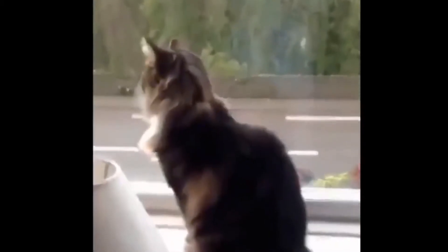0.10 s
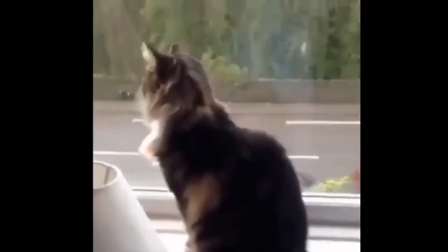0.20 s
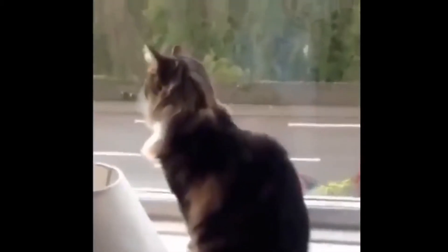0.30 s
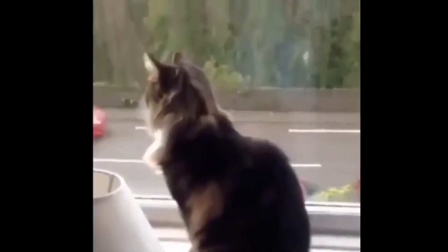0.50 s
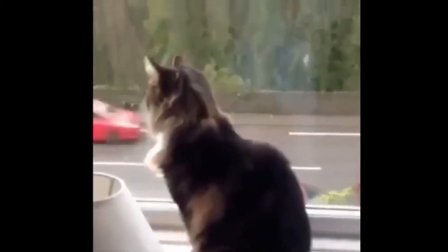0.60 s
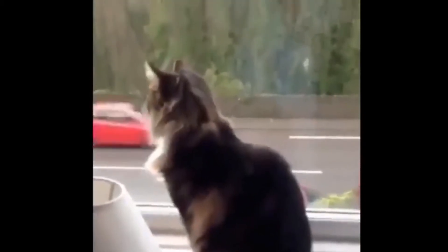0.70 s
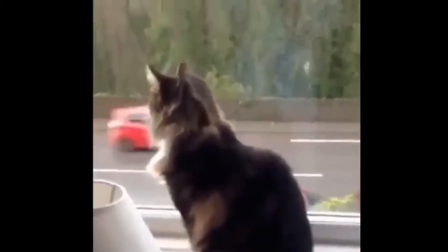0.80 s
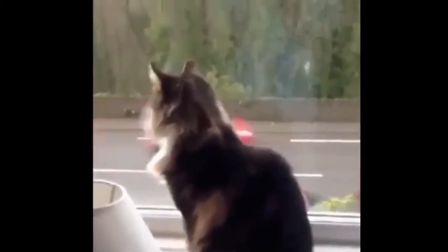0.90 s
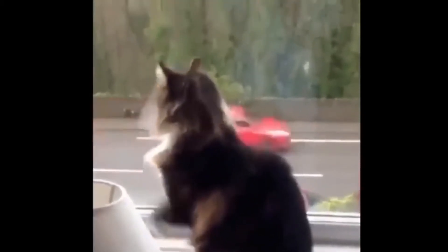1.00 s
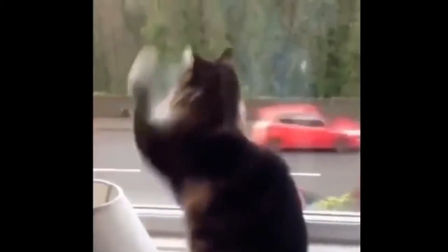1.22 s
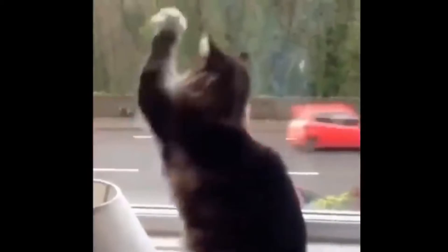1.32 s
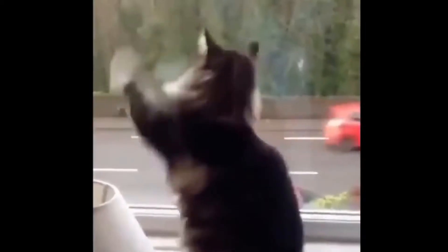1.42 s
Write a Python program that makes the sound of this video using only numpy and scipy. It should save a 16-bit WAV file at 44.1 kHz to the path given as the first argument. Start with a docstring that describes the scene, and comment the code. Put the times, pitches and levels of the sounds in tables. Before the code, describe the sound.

A cat bats a window pane: a rapid flurry of soft, low thuds, scuffing fur and pads and a brief claw scratch, then quiet with one tiny late tick; small room, phone a couple of metres away.

```python
"""A quiet room with a window pane, at which a cat scrabbles; a phone listens a couple of metres off.
Dragging pads keep a pane mode humming by stick and slip; soft blows thud as brief pushes on decaying modes.
Fur and pads scuff as dense random grains over rubbing noise; claws scratch as decaying bands of noise.
Behind it lie a faint hiss of drifting noise bands and a low flickering drone of the road through the glass,
which is noise through one broad resonance."""
import sys
import numpy as np
from scipy import signal
from scipy.fft import rfft, irfft
from scipy.io import wavfile
from scipy.ndimage import uniform_filter1d

SR = 44100
rng = np.random.default_rng(int(sys.argv[2]) if len(sys.argv) > 2 else 0)


def unload_audio(sound):
    """Save the sound as a 16-bit wav file, at the path given as the first command line argument."""
    columns = np.transpose(np.atleast_2d(sound))
    # keep every value between -1 and 1, then stretch to whole-number steps
    steps = np.round(np.clip(columns, -1, 1) * 32767)
    wavfile.write(sys.argv[1], SR, steps.astype(np.int16))


def attenuation_scalar(level_db):
    """Turn a level in dB into a linear amplitude multiplier (20 dB per decade)."""
    decades = np.asarray(level_db, float) / 20
    return 10 ** decades


N = 63945  # length [samples]

# Modes of pane and frame, ringing freely: (frequency [Hz], relative level [dB], t60 [s])
PANE_MODES = [(55, -29.5, 0.59), (92, -7, 0.23), (124.3, -7, 0.11), (168, -4.5, 0.37), (232, -0.5, 0.11),
              (281, -24, 0.089), (388, -4.5, 0.22), (469, -15, 0.2), (586, -16, 0.12), (645, -9, 0.083),
              (750, -12.5, 0.085), (844.7, -12.5, 0.21), (946, -15, 0.026), (1067, -16, 0.21),
              (1455, -24.5, 0.028), (1620, -13, 0.08), (2335, -30, 0.26), (2564, -13, 0.17),
              (2710, -24, 0.055), (3450, -19.5, 0.05)]


def unit(x):
    """Normalisation: scale to rms 1."""
    return x / np.sqrt(np.mean(x ** 2))


def colour(x, shape):
    """Spectral shaping: weight each frequency by a curve of (frequency [Hz], density [dB per Hz]); rms 1."""
    hz, db = np.array(shape, float).T
    f = np.maximum(np.arange(N // 2 + 1) * SR / N, 1)
    gain_db = np.interp(np.log(f), np.log(hz), db, left=-80, right=-80)
    return unit(irfft(rfft(x) * attenuation_scalar(gain_db), N))


def band(x, hz, width_hz):
    """Resonance: a second-order peak passes a band around its centre."""
    return signal.lfilter(*signal.iirpeak(hz, hz / width_hz, fs=SR), x)


def walk(rate):
    """Slow random modulation: Gaussian levels held 1 / rate s, then smoothed twice."""
    hold = int(SR / rate)
    steps = np.repeat(rng.standard_normal(N // hold + 1), hold)
    return 1.83 * uniform_filter1d(uniform_filter1d(steps, hold), hold)[:N]


def column(table, index):
    """Linear interpolation of one column over time, per sample; end values hold outside the span."""
    rows = np.array(table, float)
    return np.interp(np.arange(N) / SR, rows[:, 0], rows[:, index])


def fade(table):
    """Gating: on only within the time span of a curve, with linear ramps at both ends."""
    t = np.arange(N) / SR
    rise = np.clip((t - table[0][0]) / 0.0089, 0, 1)
    fall = np.clip((table[-1][0] - t) / 0.095, 0, 1)
    return rise * fall


def room():
    """Filtered noise: hiss whose bands drift a little, and a low resonance whose level flickers."""
    # Spectrum of the hiss: (frequency [Hz], density [dB per Hz])
    hiss_shape = [(15, -51), (25, -5.5), (119, -13), (258, 0.5), (336, -21.5), (482, -16.5), (819, -24.5),
                  (923, -22), (1170, -25), (1290, -27.5), (4100, -21.5), (7860, -25.5), (10200, -62.5),
                  (17300, -120)]
    hiss_db, drift_db = -68, 0.8
    drone_hz, drone_width_hz, drone_db = 210, 84, -70

    drone = unit(band(rng.standard_normal(N), drone_hz, drone_width_hz))
    drone = drone * attenuation_scalar(drone_db + 1.1 * walk(9.4))
    white = 0
    for f in 30 * 2 ** np.arange(0, 8.4, .5):  # half-octave steps
        white = white + band(rng.standard_normal(N), f, f / 3) * attenuation_scalar(drift_db * walk(9))
    return colour(white, hiss_shape) * attenuation_scalar(hiss_db) + drone


def claws():
    """Scratching friction: claw on glass gives band-limited noise that chatters and decays exponentially."""
    # Scratches: (time [s], initial level [dB], centre [Hz], width [Hz], t60 [s])
    scratches = [(0.041, -71.5, 1230, 1100, 0.75), (0.1867, -54, 2170, 3000, 0.42),
                 (0.216, -51, 2450, 2600, 0.6), (0.265, -43, 3920, 4480, 0.1),
                 (0.304, -50.5, 5120, 3550, 0.071), (0.3203, -25.5, 1812, 1990, 0.061),
                 (0.453, -53, 4980, 4020, 0.09), (1.4374, -56.5, 2615, 2140, 0.27)]
    chatter_db, chatter_hz = 1.5, 600  # a claw catches and slips

    t, out = np.arange(N) / SR, 0
    for s, db, hz, width_hz, t60 in scratches:
        age = np.maximum(t - s, 0)
        edges = [max(hz - width_hz / 2, 100), hz + width_hz / 2]
        bandpass = signal.butter(5, edges, "band", fs=SR, output="sos")
        noise = unit(signal.sosfilt(bandpass, rng.standard_normal(N)))
        envelope = np.minimum(age / .0006, 1) * np.exp(-np.log(1000) * age / t60)
        out = out + attenuation_scalar(db + chatter_db * walk(chatter_hz)) * noise * envelope
    return out


def blows():
    """Modal impact: a push convolved with the modes; longer contact rings only low modes and damps them."""
    # Pad and claw blows: (time [s], peak level [dB], contact [ms], favoured mode frequency at this spot [Hz])
    impacts = [(.188, -41, 2.1, 189), (.205, -30, 4, 111), (.256, -30.5, 2.75, 360), (.305, -22.5, 3, 140),
               (.312, -20.5, 2.9, 232), (.317, -26.5, 1.3, 232), (.3205, -24.5, 0.37, 1900),
               (.33, -25, 0.45, 647), (0.406, -40, 3.6, 150), (.418, -24.5, 0.67, 830),
               (0.438, -41.5, 0.32, 1450), (.446, -26.5, 0.83, 645), (0.539, -18, 3.1, 140),
               (0.544, -23, 1.63, 388), (.556, -23.5, 0.73, 645), (0.593, -23, 4.63, 168),
               (.6245, -35.5, 0.71, 750), (0.855, -33, 4.2, 93), (1.341, -56, 1.8, 232),
               (1.4, -57.5, 2.3, 232), (1.4385, -53.5, 0.11, 2550), (1.4392, -47, 0.29, 3450),
               (1.44, -56, 0.35, 1620), (1.443, -50, 1.7, 195)]
    pad_damp_ms = 3.8  # contact that halves the ring
    spot_db_per_oct, level_spread_db = -10, 1.7
    detune = 0.013  # relative spread of mode pitch from blow to blow

    t, out = np.arange(SR // 2) / SR, np.zeros(N)
    for s, db, ms, spot_hz in impacts:
        damping = 1 + (ms / pad_damp_ms) ** 2
        ring = 0
        for f, mode_db, t60 in PANE_MODES:
            level_db = mode_db + level_spread_db * rng.standard_normal()
            level_db += spot_db_per_oct * abs(np.log2(f / spot_hz))
            tone = np.sin(2 * np.pi * f * (1 + detune * rng.standard_normal()) * t)
            ring = ring + attenuation_scalar(level_db) * tone * np.exp(-np.log(1000) * t * damping / t60)
        push = np.sin(np.pi * np.clip(t[:600] / (ms / 1000), 0, 1)) ** 2
        start = int(s * SR)
        thud = np.convolve(ring, push)[:N - start]
        out[start:start + len(thud)] += attenuation_scalar(db) * thud / np.abs(thud).max()
    return out


def scuff():
    """Granular friction: dense tiny contacts of fur and pads over rubbing noise, which also rings the pane."""
    # Levels: (time [s], rumble [dB], low body [dB], upper body [dB], scrape [dB], treble [dB])
    levels = [(.15, -71, -89, -84, -80, -92.5), (.172, -75, -77, -96, -83, -74),
              (.192, -61.5, -50.5, -53, -70, -66), (.214, -33, -48, -54.5, -63, -61),
              (.244, -54, -47.5, -54.5, -63.5, -65), (.258, -48, -29, -43.5, -59, -53.5),
              (.268, -38, -37, -42.5, -42.5, -53.5), (.282, -41.5, -39.5, -52, -47.5, -53.5),
              (.3, -34, -29.5, -38, -41, -45.5), (.317, -27.5, -30.5, -34.5, -40, -43),
              (.335, -32, -23.5, -25, -34, -45.5), (.372, -47, -36.5, -37.5, -43, -56),
              (.392, -30.5, -32, -41, -46.5, -54.5), (.444, -34.5, -33, -35, -44, -54.5),
              (.458, -31.5, -31, -43.5, -44.5, -49), (.484, -32.5, -34, -41.5, -45, -54),
              (.522, -36.5, -53, -51, -54, -64.5), (.55, -28.5, -29.5, -39, -53.5, -65.5),
              (.59, -42, -40.5, -42, -47, -67), (.612, -35, -32, -43.5, -54, -66.5),
              (.65, -45, -42.5, -52, -60, -73), (.68, -40, -42, -54.5, -69, -78.5),
              (.712, -63.5, -53, -71, -77.5, -87), (.768, -47, -60, -68, -77.5, -89),
              (.825, -54.5, -61, -77, -81, -84.5), (.858, -60, -53.5, -69, -99, -100),
              (.9, -59.5, -58, -70, -100, -83), (.98, -55.5, -65.5, -78, -98, -98),
              (1.03, -64, -72.5, -98, -108, -99), (1.22, -75, -80, -90, -102, -99)]
    # Colour of each band: (frequency [Hz], density [dB per Hz])
    rumble = [(25, -31), (40, -21), (60, -0.5), (75, -8.5), (95, -1), (130, -3.5), (150, 0)]
    low_body = [(190, 8), (230, -1), (310, -2), (390, -3.5), (460, -11.5), (520, -24)]
    upper_body = [(420, -21), (500, 1.5), (620, -1), (820, -4.5), (950, -9.5), (1080, -23.5)]
    scrape = [(850, -17.5), (1050, -3.5), (1250, -4.5), (1550, -4.5), (2100, -5), (2800, -9.5), (3100, -22),
              (3600, -15)]
    treble = [(2800, -1.5), (3400, 0.5), (4500, -3), (5800, -5.5), (7000, -8.5), (7900, -23.5),
              (8400, -43.5)]
    grains_per_s, grain_spread_db = 1500, 2
    ringing_db, flicker_db = -11, 1

    out = 0
    for k, shape in enumerate((rumble, low_body, upper_body, scrape, treble)):
        hits = rng.random(N) < grains_per_s / SR
        strength = rng.standard_normal(N) * attenuation_scalar(grain_spread_db * rng.exponential(size=N))
        rub = unit(hits * strength) * 0.46 + rng.standard_normal(N)
        rings = 0
        for f, _, t60 in PANE_MODES:
            rubbed_t60 = min(t60, .15)
            rings = rings + band(rub, f, 2.7 / rubbed_t60) * np.sqrt(rubbed_t60)
        mix = colour(rub, shape)
        if 0 < k < 4:  # the pane rings in the three middle bands
            mix = mix + attenuation_scalar(ringing_db) * colour(rings, shape)
        out = out + unit(mix) * attenuation_scalar(column(levels, index=k + 1) + flicker_db * walk(40))
    return out * fade(levels)


def hum():
    """Stick-slip oscillation: dragging pads keep a low pane mode near 168 Hz going, a little rough."""
    # Course of the hum: (time [s], pitch [Hz], level [dB])
    course = [(0.16, 177.8, -76), (0.182, 183.3, -56), (0.208, 207, -45), (0.226, 205, -58),
              (0.244, 200.3, -30.5), (0.258, 196.7, -41), (0.284, 177.5, -43), (0.312, 174, -18.5),
              (0.322, 183.4, -45.5), (0.338, 171.2, -38.5), (0.364, 158.7, -26), (0.408, 158.3, -29),
              (0.434, 170.4, -28.5), (0.468, 166.8, -46.5), (0.476, 169.9, -27.5), (0.562, 171.2, -24.5),
              (0.59, 171.9, -35.5), (0.598, 171.7, -24.5), (0.654, 165, -27.5), (0.712, 170, -40),
              (0.832, 168.9, -57.5), (0.842, 168.6, -51.5), (0.892, 167, -57.5), (0.926, 147, -57.5),
              (0.95, 170.3, -57.5), (1.08, 161, -67), (1.188, 186.3, -64), (1.2, 209, -64)]
    waver_db, rough_db, rough_hz = 0.3, -17, 40.67

    phase = 2 * np.pi * np.cumsum(column(course, index=1)) / SR
    rough = walk(rough_hz) * np.sin(phase) + walk(rough_hz) * np.cos(phase)
    tone = np.sqrt(2) * (np.sin(phase) + attenuation_scalar(rough_db) * rough)
    return tone * attenuation_scalar(column(course, index=2) + waver_db * walk(17)) * fade(course)


def scene():
    """Superposition: the sources add at one microphone, which feeds both channels."""
    mid = room() + claws() + blows() + scuff() + hum()
    return np.array([mid, mid])


def low_pass(x):
    """Removes everything above the highest recorded frequency."""
    return signal.sosfilt(signal.butter(12, 8010, fs=SR, output="sos"), x)


def record(dry):
    """Saturation and band limiting: the phone rounds off the loudest swings and cuts both spectral ends."""
    ceiling = 0.13  # amplitude that the rounded swings approach
    x = dry / (1 + np.abs(dry / ceiling) ** 4) ** .25
    x = signal.sosfilt(signal.butter(2, 30, "high", fs=SR, output="sos"), x)
    x = signal.sosfilt(signal.ellip(8, .3, 50, 7920, fs=SR, output="sos"), x)
    return low_pass(x)


dry = scene()
out = record(dry)
unload_audio(out)
```